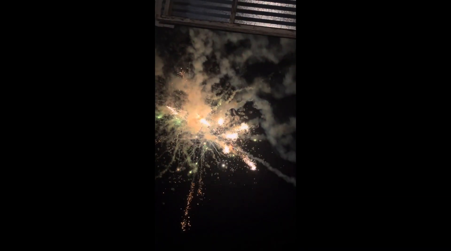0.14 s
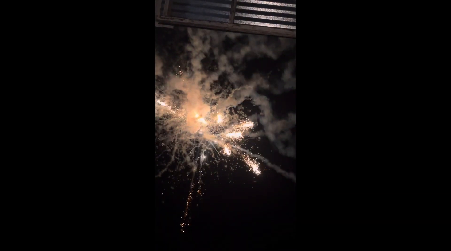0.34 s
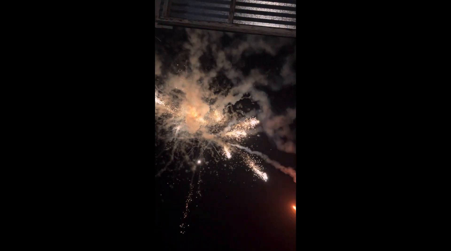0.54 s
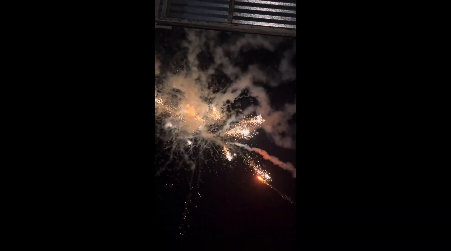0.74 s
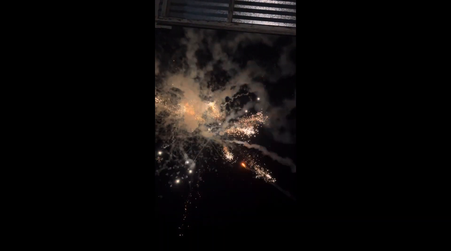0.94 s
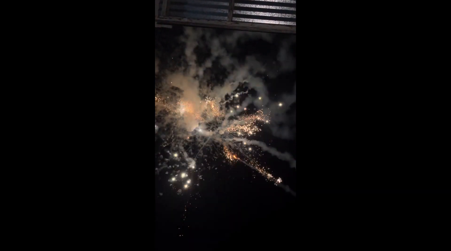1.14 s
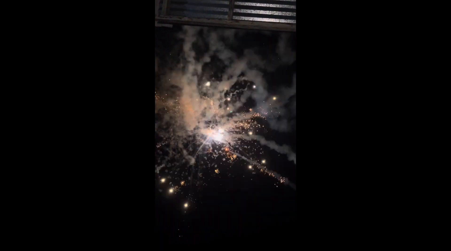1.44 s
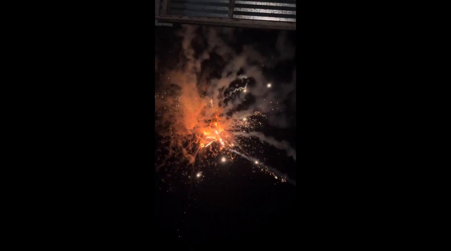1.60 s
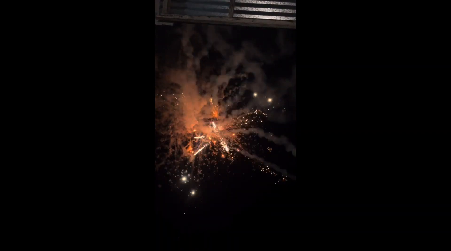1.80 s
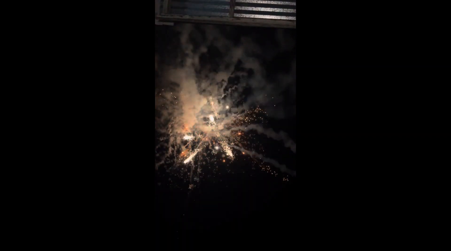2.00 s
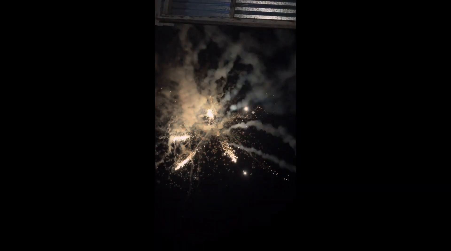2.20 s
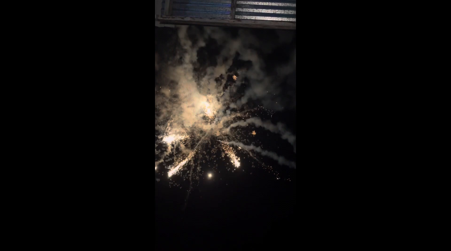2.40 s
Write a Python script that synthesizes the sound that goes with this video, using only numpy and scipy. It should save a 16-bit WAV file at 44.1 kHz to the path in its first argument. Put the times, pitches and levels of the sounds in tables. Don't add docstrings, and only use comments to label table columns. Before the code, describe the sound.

Two loud firework bangs with rumbling echoes amid a steady fizzing rain of sharp crackles

```python
import sys
import numpy as np
from scipy import signal
from scipy.fft import rfft, irfft, next_fast_len
from scipy.io import wavfile

SR = 44100
rng = np.random.default_rng(int(sys.argv[2]) if len(sys.argv) > 2 else 0)


def linear_from_db(decibels):
    return 10 ** (np.asarray(decibels, float) / 20)


def pcm_store(signal):
    levels = np.round(np.clip(np.atleast_2d(signal), -1, 1) * 32767)
    wavfile.write(sys.argv[1], SR, levels.astype(np.int16).T)


N = 112454
SIZE = next_fast_len(N + SR)
HZ = np.arange(SIZE // 2 + 1) * SR / SIZE


def rms_one(x):
    return x / np.sqrt(np.mean(x ** 2) + 1e-20)


def at_hz(points):
    p = np.array(points)
    return np.interp(np.log(HZ + 1), np.log(p[:, 0]), p[:, 1])


def colour(x, gain_db):
    return irfft(rfft(x, SIZE) * linear_from_db(gain_db), SIZE)[..., :N]


def drift(rate_hz):
    r = np.exp(-2 * np.pi * rate_hz / SR)
    noise = rng.standard_normal(N + SR)
    return rms_one(signal.lfilter([1], [1, -2 * r, r * r], noise)[SR:])


def clicks(start_s, level_db):
    out = np.zeros(N)
    at = np.clip((np.asarray(start_s) * SR).astype(int), 0, N - 1)
    np.add.at(out, at, linear_from_db(level_db))
    return out


# frequency in Hz, likeness 0-1.
LIKENESS = [(60, .99), (700, .92), (1500, .8), (3000, .72), (4300, .3), (5600, .97), (16000, .97)]
# frequency in Hz, left over right in dB.
LEFT_DB = [(100, -.3), (500, .3), (1100, 2), (2200, -.2), (4500, -.8), (16000, 0)]


def ports(x, lead, scatter):
    scatter_s = 0.0016
    sides = np.array([[1], [-1]])
    unlike = np.clip(scatter * (1 - at_hz(LIKENESS)), 0, 1)
    lead_hz, lead_rad = np.transpose(lead)
    turn = np.exp(.5j * np.interp(HZ, lead_hz, lead_rad) * sides)
    t = np.arange(600) / SR
    own = rng.standard_normal((2, len(t))) * np.exp(-t / scatter_s)
    own = rfft(own / np.sqrt(np.sum(own ** 2, axis=1, keepdims=True)), SIZE)
    gain = linear_from_db(.5 * at_hz(LEFT_DB) * sides)
    path = np.sqrt(1 - unlike) * turn + np.sqrt(unlike) * own
    return irfft(rfft(x, SIZE) * gain * path, SIZE)[:, :N]


# start in seconds, low echo in dB, high echo in dB,
# roof level in dB, roof wait in seconds.
SHOTS = [
    (-.2, -34.5, -48, -39, 0.0052),
    (0.212, -25, -24.5, -23, 0.0038),
    (1.5887, -26, -45, -20, 0.061),
]
# centre in Hz, level in dB, t60 in seconds.
ROLL = [(68.6, -63, .4), (138, -3, 0.94), (300, -0.5, 0.53), (593, -3.5, 0.4), (1110, -10, 0.21),
        (2450, -1, 0.23), (3770, -3.5, 0.27), (9100, -16, 0.36)]


def roll():
    rise_s, lump_db, lump_hz = 0.0053, 3.5, 40
    out, t = np.zeros((2, N)), np.arange(N) / SR
    for hz, band_db, t60_s in ROLL:
        white = rng.standard_normal((2, N))
        white[1] *= np.clip(hz / 2500, 0, 1)
        octave = signal.butter(2, [hz / 2 ** .5, hz * 2 ** .5], "band", fs=SR, output="sos")
        mid, side = signal.sosfilt(octave, white)
        band = rms_one(np.array([mid + side, mid - side])) * linear_from_db(lump_db * drift(lump_hz))
        for start_s, low_db, high_db, *_ in SHOTS:
            age = np.maximum(t - start_s, 0)
            shot_db = low_db if hz < 1500 else high_db
            decay = linear_from_db(band_db + shot_db - 60 * age / t60_s)
            out += band * decay * (1 - np.exp(-age / rise_s))
    return out


# frequency in Hz, level in dB, t60 in seconds, lateness in seconds.
ROOF = [
    (46.6, 0, .64, .001),
    (51.2, 0, .64, .004),
    (62, 5, .16, -.0035),
]


def roof():
    rise_s, decay_bend = 0.028, 1.6
    swing_lag = .15
    out, t = np.zeros(N), np.arange(N) / SR
    for start_s, _, _, shot_db, wait_s in SHOTS:
        swell = 1 / (1 + np.exp(-np.clip((t - start_s - wait_s) / rise_s * 4, -50, 50)))
        for hz, mode_db, t60_s, late_s in ROOF:
            age = np.maximum(t - start_s - late_s - swing_lag * wait_s, 0)
            decay = linear_from_db(mode_db + shot_db - 60 * (age / t60_s) ** decay_bend)
            out += swell * decay * np.sin(2 * np.pi * hz * age)
    return out


# start in seconds, push (+) or pull (-) around 1, level in dB,
# tilt in dB per octave above the knee.
BANGS = [(0.2038, -1.1, -13.5, -9), (0.2073, 1, -8, -6), (.211, 1, -10, -4), (0.2144, 1, 4, 0),
         (.2168, -1, -9, -12), (0.2218, 0.96, -6, 1), (0.2236, -0.75, -17, -12), (0.2358, 0.86, -15.5, -11),
         (0.259, 0.59, -16.5, -12), (0.2886, 1, -14, -18), (1.589, 1, 7.5, -1.5), (1.5996, 1, -8, -8),
         (1.6025, 0.8, -19, -12), (1.6077, 0.91, -17, -14), (1.6234, -0.87, -12.5, -3),
         (1.627, -0.83, -8, -4), (1.6334, 0.89, -11, -6)]
# frequency in Hz, level in dB per Hz.
BANG = [(25, -8), (55, 8), (120, 3.5), (300, 0), (700, -12.5), (2000, -25), (3500, -35), (16000, -51.5)]


def bangs():
    knee_hz, trim_db, trim_tilt_db = 577, 32, 3
    octaves = np.log2(np.maximum(HZ, knee_hz) / knee_hz)
    out = np.zeros(N)
    for start_s, push, level_db, tilt_db in BANGS:
        click = clicks([start_s], level_db + trim_db)
        out += push * colour(click, at_hz(BANG) + (tilt_db + trim_tilt_db) * octaves)
    return out


# start in seconds, peak in dB, extra treble snap in dB.
STARS_EARLY = [(0.0575, -20, -14), (0.1282, -22, -8), (0.1414, -19, -20), (0.1911, -20, -20),
               (0.2373, -22, -8), (0.239, -21, -8), (0.241, -20, -11), (0.2448, -17, -20),
               (0.2479, -18, -20), (0.2501, -21, -3), (0.2536, -22, -8), (0.2606, -21, -10),
               (0.3268, -22, -20), (0.3563, -21, -15), (0.3686, -21, -20), (0.3732, -22, -20),
               (0.3845, -21, -20), (0.4265, -22, -2), (0.4346, -21, -10), (0.4509, -22, -10),
               (0.4738, -22, -2), (0.5259, -22, -12), (0.5299, -22, -10), (0.5346, -20, -20),
               (0.5408, -17, -14), (0.5536, -21, -20), (0.5754, -22, -5), (0.5875, -23, -20),
               (0.6014, -23, -4), (0.6306, -21, -20), (0.6616, -22, -5), (0.6783, -22, -20),
               (0.6845, -22, -20), (0.6909, -20, -18), (0.6978, -21, -9), (0.7159, -23, 1),
               (0.7332, -22, -8), (0.7357, -23, -4), (0.7402, -21, -20), (0.7528, -22, -2),
               (0.8114, -22, -12), (0.8157, -23, -4), (0.8181, -16, -12), (0.8443, -21, 2),
               (0.9152, -21, -7), (0.9383, -21, -7), (0.9582, -22, -3), (0.9913, -21, -14)]
STARS_MIDDLE = [(0.9954, -21, -1), (0.9999, -21, -17), (1.0017, -21, 1), (1.0591, -18, -20),
                (1.0692, -18, -6), (1.1429, -19, -12), (1.1758, -18, -9), (1.1864, -19, -13),
                (1.1997, -20, 2), (1.2168, -20, -20), (1.2359, -20, -20), (1.2473, -17, -20),
                (1.2583, -18, -20), (1.2637, -19, -6), (1.2785, -19, -8), (1.2874, -18, -16),
                (1.3205, -19, -20), (1.3312, -20, -2), (1.3738, -19, -1), (1.3816, -19, -16),
                (1.3881, -18, -5), (1.3924, -20, -20), (1.4339, -20, -6), (1.442, -17, -20),
                (1.4968, -19, -20), (1.4984, -19, -7), (1.5034, -18, -11), (1.5569, -19, -1),
                (1.5594, -20, -17), (1.5686, -20, -6), (1.5743, -20, -4), (1.5809, -20, -14),
                (1.6699, -19, -20), (1.7084, -21, -20), (1.7176, -19, -5), (1.7213, -18, -20),
                (1.7304, -21, -20), (1.7332, -20, -20), (1.7644, -18, -15), (1.7719, -18, -20),
                (1.7806, -21, -1), (1.7967, -20, -5), (1.8028, -21, 0), (1.8075, -18, -4),
                (1.8101, -19, -20), (1.8376, -21, -7), (1.8407, -17, -2), (1.848, -18, -8)]
STARS_LATE = [(1.8565, -14, -2), (1.8602, -20, -2), (1.8659, -19, -7), (1.8793, -18, -11),
              (1.8814, -22, -7), (1.8854, -15, -3), (1.8918, -21, -20), (1.9023, -16, -10),
              (1.9276, -22, -4), (1.9296, -21, -8), (1.9457, -19, -20), (1.9596, -19, -20),
              (1.9629, -20, 1), (1.9819, -19, -2), (1.9868, -21, -6), (2.0012, -17, -1), (2.0064, -18, -2),
              (2.0179, -21, -3), (2.028, -21, 0), (2.036, -19, -20), (2.0555, -21, -20), (2.0768, -20, -20),
              (2.0879, -16, -3), (2.1062, -17, -6), (2.113, -20, -9), (2.1678, -19, -20),
              (2.1857, -23, -20), (2.1904, -23, -2), (2.2005, -20, -2), (2.2063, -21, -2),
              (2.2116, -23, -1), (2.2135, -20, -9), (2.2297, -18, -3), (2.2434, -21, -4), (2.2825, -21, -4),
              (2.2943, -21, -6), (2.3043, -15, -3), (2.3153, -17, -17), (2.3214, -20, -3),
              (2.3637, -13, -3), (2.3758, -20, -3), (2.3806, -16, -11), (2.3838, -21, -20),
              (2.461, -21, -16), (2.4656, -21, -11), (2.5094, -20, -7), (2.5119, -20, 5), (2.544, -20, -3)]
# time in seconds, level in dB, small cracks per second, extra treble snap in dB.
CLOUD = [(0, -37, 550, -5), (.4, -36, 390, -6), (.8, -38, 440, -2), (0.979, -37.5, 510, 2),
         (1.15, -34, 570, -4), (1.35, -34, 910, -4), (1.72, -35, 510, -14), (1.82, -35.5, 330, -14),
         (2.11, -38.5, 170, -10), (2.16, -41, 100, -7), (2.3, -38.5, 160, -1), (2.55, -39, 120, 7)]
# frequency in Hz, level in dB per Hz.
CRACK = [(40, -21), (150, -12), (500, -3), (1500, -0.5), (3000, -3.5), (6000, -10.5), (13000, -22.5),
         (16500, -29.5)]
# frequency in Hz, level in dB per Hz.
HISS = [(42, -38), (75, -1), (400, -2.5), (1500, -6), (3000, -1), (6000, -3.5), (13500, -26), (16500, -17)]
# time in seconds, share 0-1.
SPREAD = [(1.74, 0), (1.8, .8), (2.33, .8), (2.4, .1), (2.55, .6)]
# frequency in Hz, left lead in radians.
STAR_LEAD = [(0, -.1), (1500, 0), (2700, 2.1), (4000, .9), (4900, 1.6), (6000, 3.14), (14400, 15.5),
             (16500, 16.3)]


def stars():
    parts, snap_hz = 12, 6000
    small_db, small_spread_db, clump_db = 14.5, 1.5, 0.96
    hiss_db, hiss_flicker_db = -1.5, 1.5
    late_s, peak_trim_db, snap_trim_db = 0.0001, 8, 1

    t = np.arange(N) / SR
    cloud_s, cloud_db, cloud_rate, cloud_snap_db = np.transpose(CLOUD)
    level_db = np.interp(t, cloud_s, cloud_db)
    cracks_per_s = np.interp(t, cloud_s, cloud_rate)
    small_snap = linear_from_db(np.interp(t, cloud_s, cloud_snap_db))
    born = rng.random(N) < cracks_per_s * linear_from_db(clump_db * drift(20)) / SR
    louder_db = small_spread_db * np.minimum(rng.exponential(1, N), 3)
    small = born * linear_from_db(level_db + small_db + louder_db)

    start_s, peak_db, extra_db = np.transpose(STARS_EARLY + STARS_MIDDLE + STARS_LATE)
    start_s, peak_db, extra_db = start_s + late_s, peak_db + peak_trim_db, extra_db + snap_trim_db
    crack_clicks = small + clicks(start_s, peak_db)
    snap_clicks = small * small_snap + clicks(start_s, peak_db + extra_db)

    spread = np.interp(t, *np.transpose(SPREAD))
    bright = signal.butter(1, snap_hz, "high", fs=SR)
    treble = HZ ** 2 / (HZ ** 2 + snap_hz ** 2)
    hiss_gain = linear_from_db(level_db + hiss_db + hiss_flicker_db * drift(29)) / np.sqrt(parts)
    dealt = rng.integers(0, parts, N)
    out = np.zeros((2, N))
    for part, tilt_db in enumerate(np.linspace(-.8, .8, parts)):
        shape = linear_from_db(at_hz(CRACK) + tilt_db * np.log2((HZ + 1) / 2000))
        shape = 1j * shape / np.mean(shape)
        here = dealt == part
        cracks = irfft(rfft(crack_clicks * here, SIZE) * shape, SIZE)[:N]
        snaps = irfft(rfft(snap_clicks * here, SIZE) * shape * treble, SIZE)[:N]
        hiss = rms_one(colour(rng.standard_normal(N), at_hz(HISS))) * hiss_gain
        bright_hiss = signal.lfilter(*bright, hiss)
        hiss = hiss - (1 - np.sqrt(1 - spread ** 2)) * bright_hiss
        snaps = snaps + spread * bright_hiss
        out += ports(cracks + hiss, STAR_LEAD, scatter=0.83)
        out += ports(snaps, STAR_LEAD, scatter=24)
    return out


# frequency in Hz, left lead in radians.
BANG_LEAD = [(0, -.2), (120, -.4), (500, -1.2), (1400, -1), (2000, .3), (2700, 2), (4000, .9), (16500, 18)]


def scene():
    return roll() + roof() + ports(bangs(), BANG_LEAD, scatter=.1) + stars()


def top_cut(x):
    return signal.sosfilt(signal.butter(12, 16670, fs=SR, output="sos"), x)


# frequency in Hz, gain in dB.
MIC = [(10, -26), (28, -2), (42, 0), (15800, 0), (16050, -8), (16200, -32), (16700, -45)]


def record(dry):
    sweep_cycles, sweep_hz, floor_hz, top = 1.428, 14740, 23, 1.4
    sweep = np.exp(-2j * np.pi * sweep_cycles * np.log((HZ + floor_hz) / sweep_hz))
    swept = irfft(rfft(dry, SIZE) * sweep * linear_from_db(at_hz(MIC)), SIZE)[:, :N]
    mix = top * np.tanh(swept / top)
    return top_cut(mix)


dry = scene()
out = record(dry)
pcm_store(out)
```